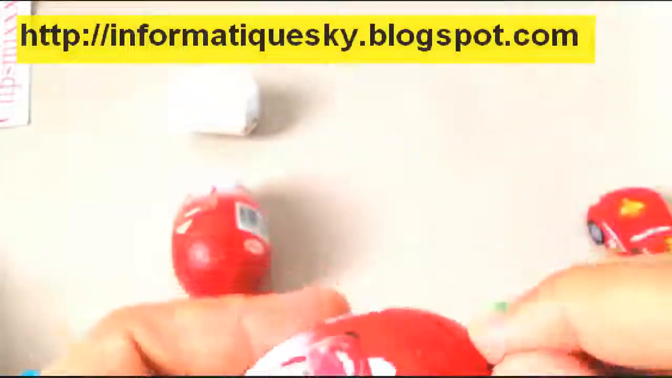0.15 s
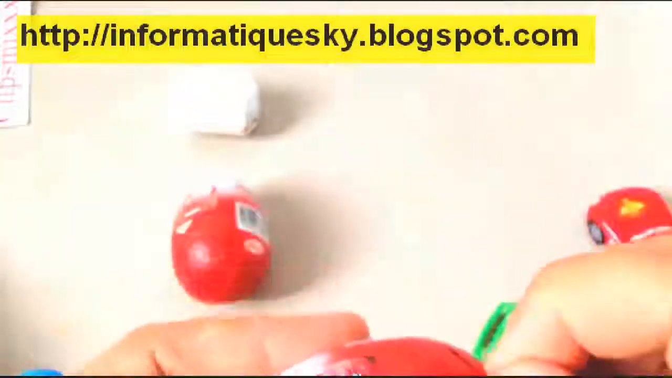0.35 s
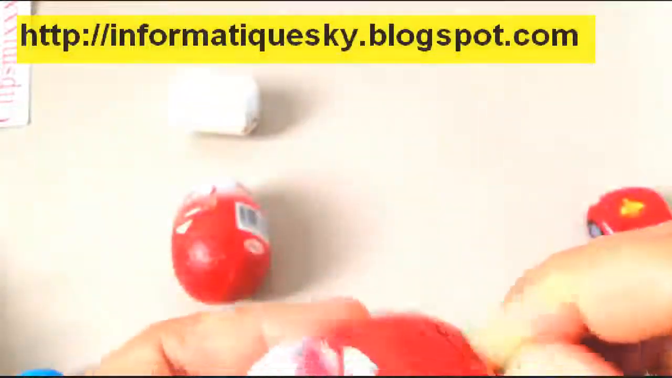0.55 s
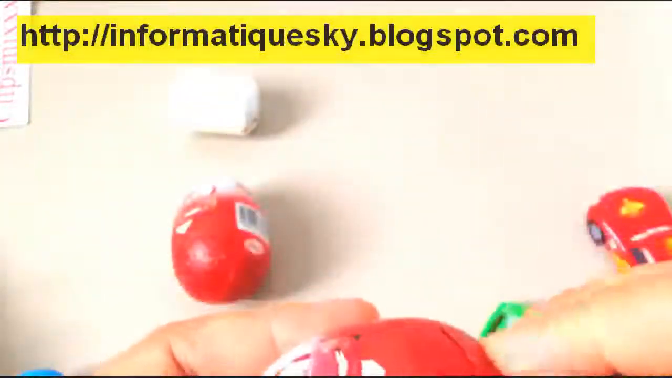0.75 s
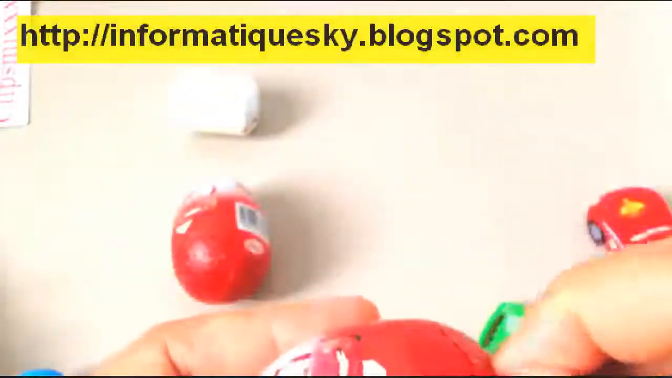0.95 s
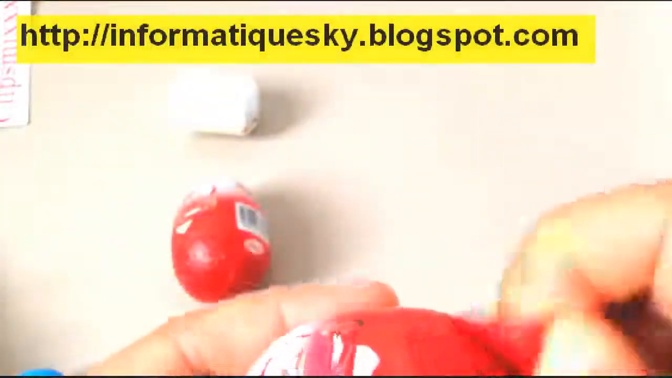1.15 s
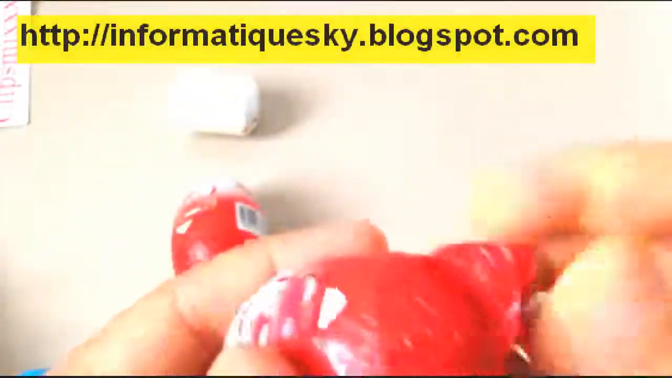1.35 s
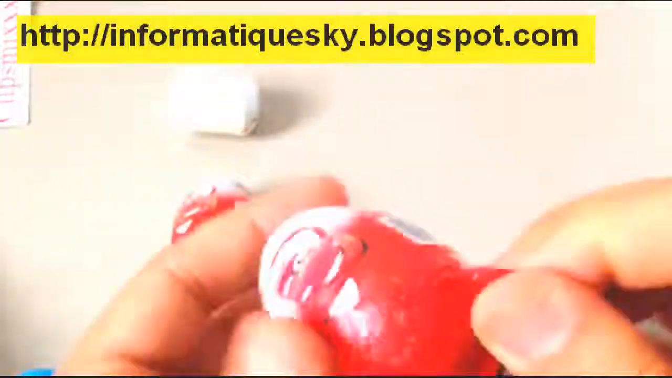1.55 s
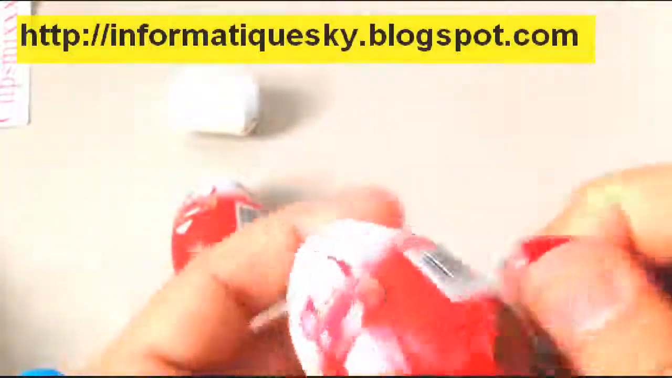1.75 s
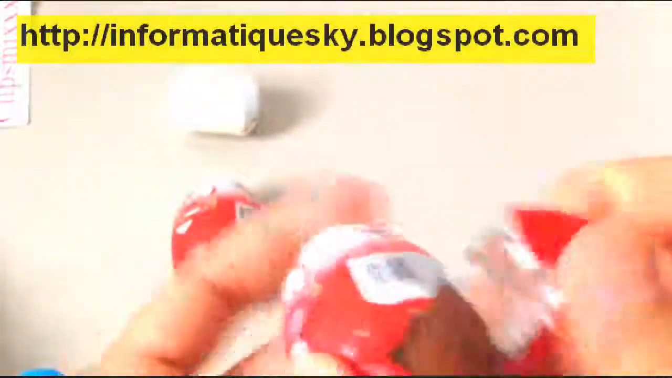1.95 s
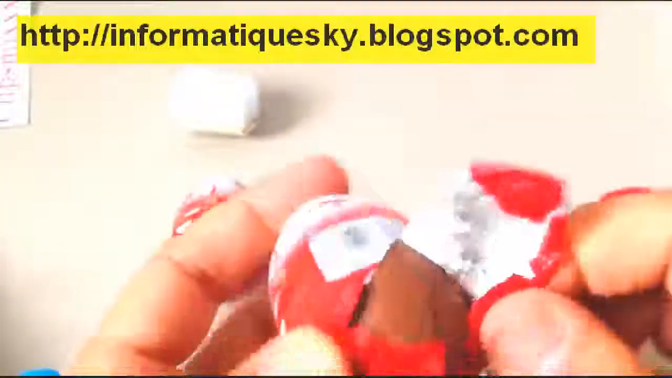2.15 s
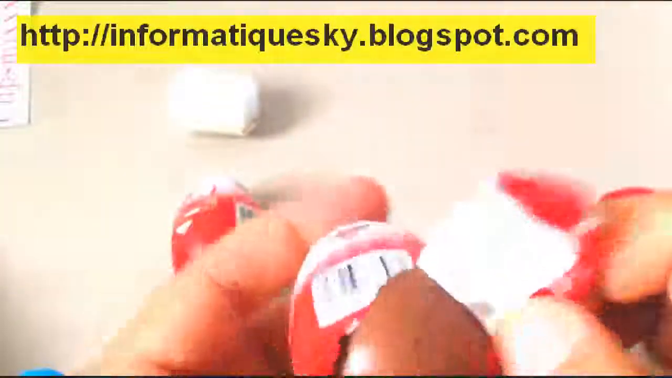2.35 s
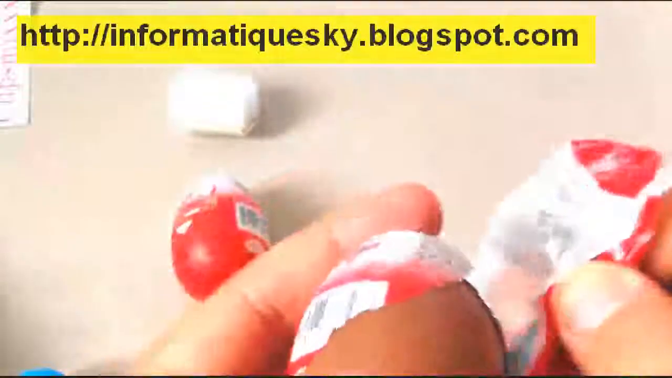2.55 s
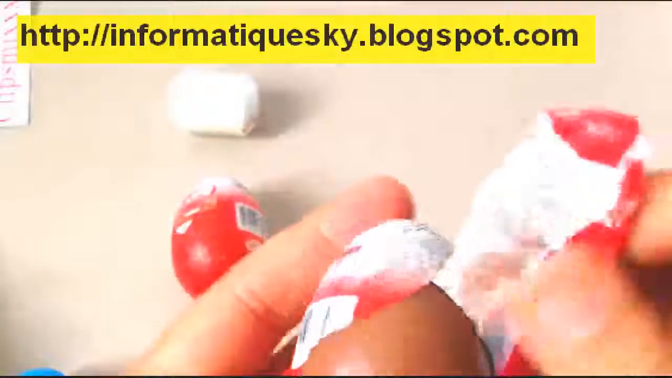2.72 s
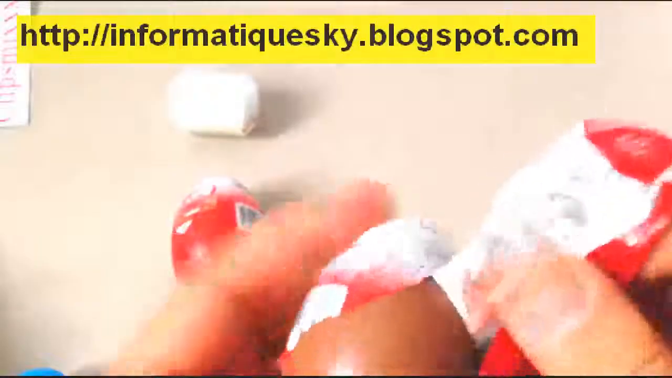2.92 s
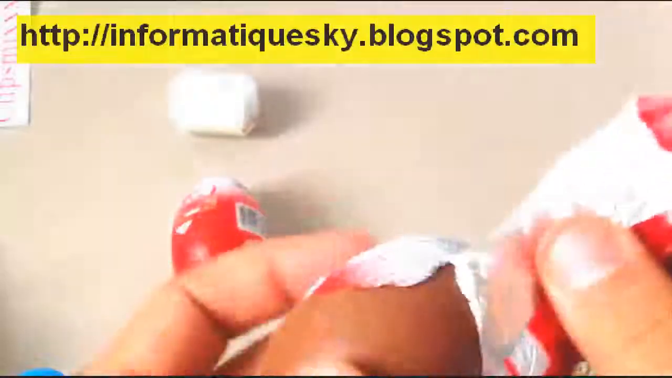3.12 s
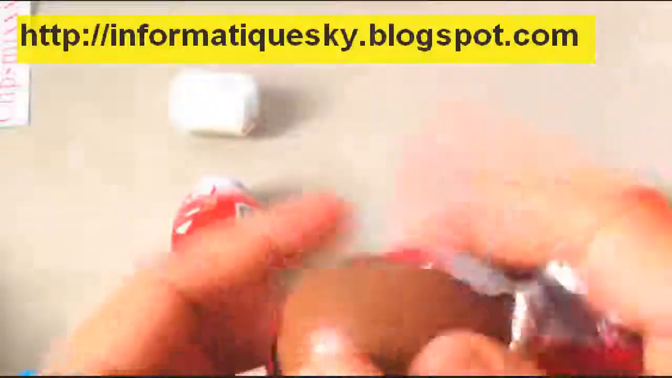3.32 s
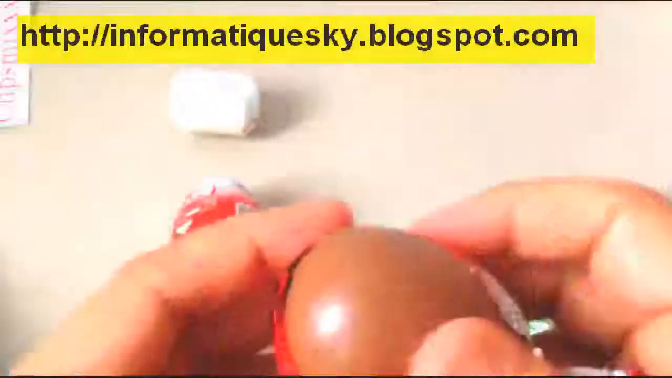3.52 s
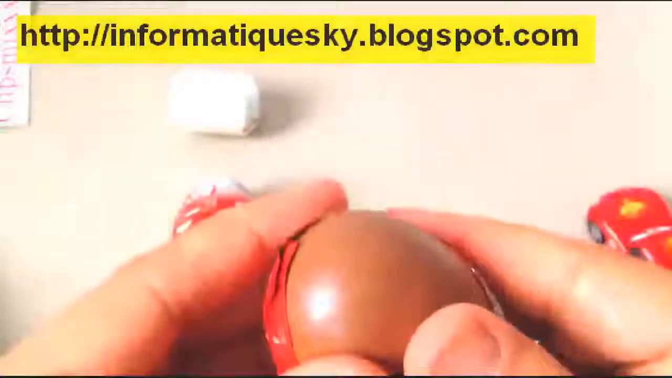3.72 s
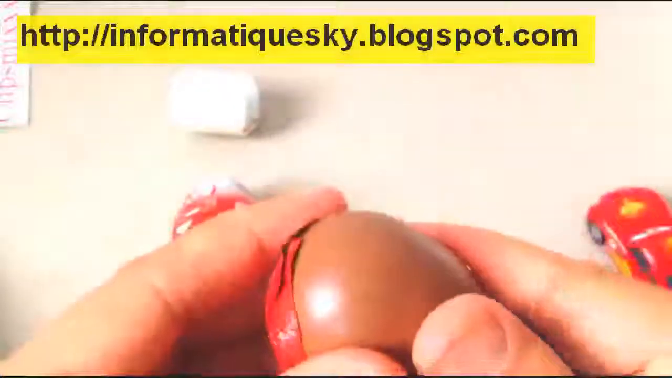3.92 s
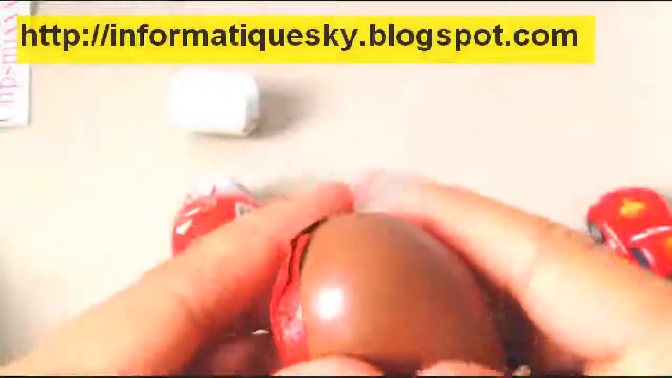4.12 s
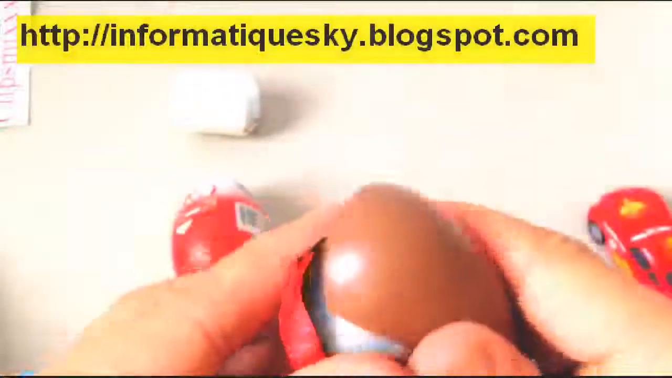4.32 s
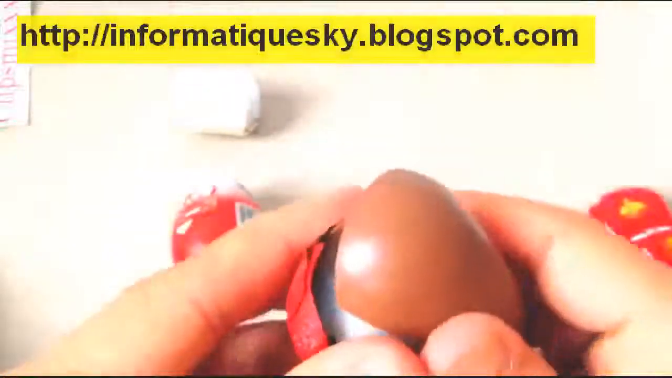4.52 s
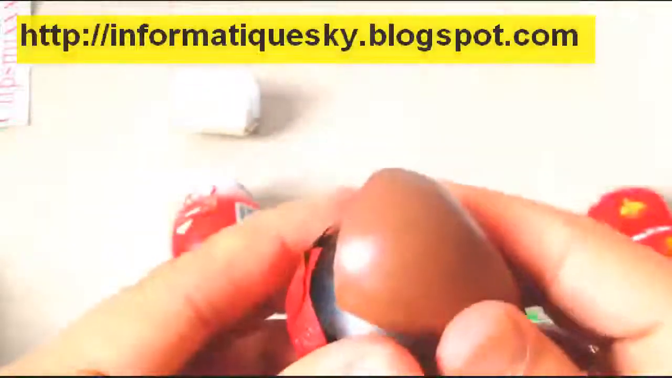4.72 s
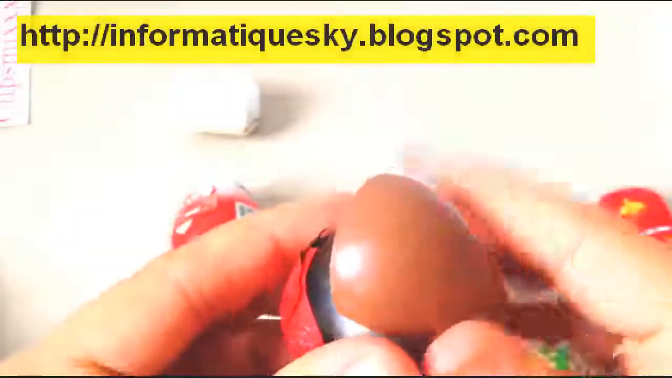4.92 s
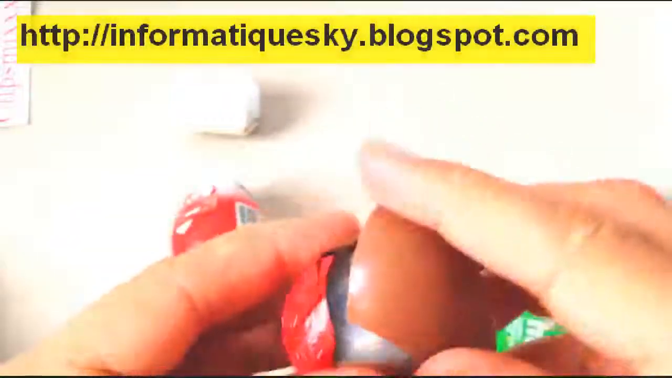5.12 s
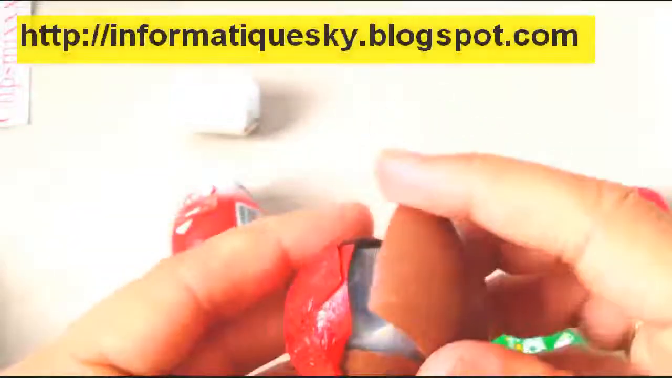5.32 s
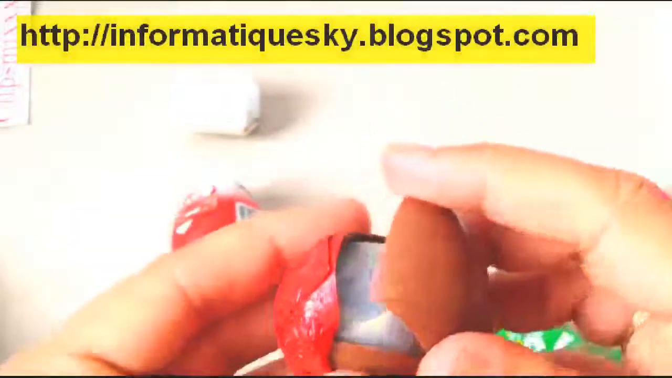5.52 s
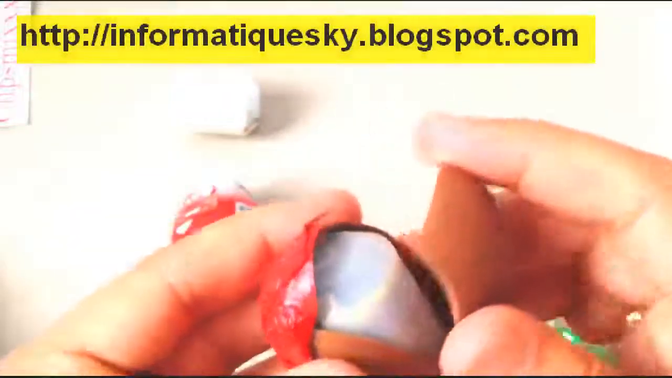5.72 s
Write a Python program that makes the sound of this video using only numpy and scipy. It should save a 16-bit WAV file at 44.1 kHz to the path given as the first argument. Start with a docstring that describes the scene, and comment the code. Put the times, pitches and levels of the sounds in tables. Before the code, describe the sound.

A faint rustle of fingertips on thin foil opens the sound. From about 0.6 seconds, short crinkles and sharp ticks follow as the wrapper is picked off a hollow chocolate egg. The foil tears in bright, uneven bursts, with the sharpest snaps around 1.3 and 1.8 seconds. After a brief lull, dense crunching returns around 2.5 seconds and again from 3 to 3.5 seconds. The handling then turns quieter and sparser: fingers sliding, light rubs on the hollow shell and small crackles, with a clearer tick near 4.2 seconds and another near 5. At about 5.3 seconds the chocolate shell cracks with a short snap, and the sound dies down. Hands bump the table very softly around 3, 3.7 and 5.4 seconds. Everything is close to the microphone in a fairly dry room, over faint rumble, hum and steady hiss.

```python
"""A faint rustle, then crinkling: fingers peel thin metal foil off a hollow chocolate egg.
Each pull buckles many small facets and tears the sheet. Sharp snaps stand out: foil creases
flipping, and near the end the chocolate shell cracking.
Indoors at a table, close to a mono camera microphone. The hands bump the table now and then,
over room rumble, a faint hum and microphone hiss."""
import sys
import numpy as np
from scipy import signal
from scipy.fft import rfft, irfft, next_fast_len
from scipy.io import wavfile
from scipy.ndimage import map_coordinates

SR = 44100
rng = np.random.default_rng(int(sys.argv[2]) if len(sys.argv) > 2 else 0)


def inscribe(sig):
    """Save sig as 16-bit PCM at rate SR to the path in sys.argv[1].

    A 1-D sig is mono; a 2-D sig holds one channel per row.
    Samples are clipped to [-1, 1] before scaling.
    """
    pcm = np.round(np.clip(np.atleast_2d(sig).T, -1, 1) * 32767)
    wavfile.write(sys.argv[1], SR, pcm.astype(np.int16))


N = 258852

# fingers sliding on the foil: time_s, level_db
FINGER_RUSTLE = [(0.0, -67), (1.0, -64.5), (1.8, -56.5), (2.2, -64.5), (2.45, -53.5), (2.75, -59),
                 (3.5, -50.5), (3.92, -62.5), (4.3, -55), (4.42, -58), (4.55, -65), (4.82, -68.5),
                 (5.3, -62.5), (5.87, -75)]
# what a sharp jolt rings in the sheet: pitch_hz, width_hz, gain_db
SHEET_MODES = [(3300, 1540, -2.5), (6500, 1400, 3.5), (10900, 6500, -1.5)]


def crinkle():
    """Each pull buckles and tears the foil in clumps; the hollow egg answers lower down."""
    buckle, ring, tear, shell, fold_hz = pulls()
    clumps = amp(1.97 * wobble(60) + 2.42 * wobble(200))
    crackle = amp(-9) * buckling(buckle, ring, fold_hz) + amp(-6.5) * tear * tearing()
    return clumps * crackle + amp(-0.5) * shell * egg_shell() + amp(-10) * tear * slips()


def pulls():
    """Crunches swell and crumble away: gains of buckling, fold ring, tear and shell, and the fold pitch."""
    # crunches of the pulling hand: peak_s, length_s, level_db, fold_pitch_hz
    crunches = [(0.4, .065, -60.5, 4600), (0.634, 0.038, -46.5, 2270), (0.806, 0.02, -43, 4600),
                (1.04, 0.012, -59.5, 1980), (1.27, 0.076, -45.5, 6660), (1.31, 0.0043, -34.5, 5350),
                (1.403, 0.036, -47, 3680), (1.527, 0.0062, -39, 2720), (1.568, 0.024, -39, 4040),
                (1.632, 0.053, -41.5, 5000), (1.776, 0.033, -33.5, 2840), (1.825, 0.11, -37.5, 2860),
                (1.903, 0.059, -37, 4220), (1.943, 0.057, -39, 6040), (2.024, 0.015, -39, 3470),
                (2.135, 0.033, -38.5, 1555), (2.164, 0.039, -43.5, 2610), (2.395, 0.042, -58, 5130),
                (2.456, 0.072, -39.5, 1520), (2.497, 0.054, -36.5, 5140), (2.523, 0.047, -32.5, 3100),
                (2.555, 0.052, -34, 2400), (2.574, 0.053, -35, 1650), (2.626, 0.037, -41, 1153),
                (2.712, 0.041, -48.5, 4400), (2.793, 0.015, -52.5, 970), (2.868, 0.047, -42, 2500),
                (2.944, 0.016, -44.5, 1400), (3.017, 0.046, -47.5, 1280), (3.068, 0.062, -40.5, 5170),
                (3.1, 0.079, -41, 1590), (3.121, 0.058, -38.5, 2830), (3.168, 0.044, -34, 3600),
                (3.271, 0.019, -37, 2800), (3.292, 0.019, -31.5, 4220), (3.329, 0.023, -36.5, 3400),
                (3.394, 0.24, -53.5, 5800), (3.482, 0.028, -43, 1770), (3.519, 0.06, -42, 4060),
                (3.658, 0.085, -47.5, 2840), (3.786, 0.23, -55.5, 1460), (4.05, 0.055, -62, 2360),
                (4.19, 0.074, -43, 5840), (4.246, 0.0074, -44, 2600), (4.354, 0.15, -53.5, 6060),
                (4.466, 0.13, -61.5, 3490), (4.622, 0.096, -57.5, 6500), (4.673, 0.012, -46, 3600),
                (4.686, 0.013, -44.5, 3540), (4.725, 0.045, -56, 1490), (4.991, 0.034, -49, 4760),
                (5.101, 0.053, -55, 3570), (5.152, 0.042, -55, 2140), (5.269, 0.033, -58, 2350),
                (5.301, 0.017, -48.5, 4400), (5.349, 0.032, -39.5, 2170), (5.385, 0.093, -57.5, 3240),
                (5.452, 0.019, -59.5, 2530), (5.791, 0.03, -60, 2020)]
    # weight of tearing and shell in a crunch as the peeling goes on: time_s, tear_db, shell_db
    peel = [(0.75, -12, -39), (1.03, 6, 4), (1.28, 0, -55), (1.58, 1.5, -11), (1.8, 5.5, -37),
            (1.92, -18, -20.5), (2.1, 0.5, -7), (2.53, -8.5, -21), (2.7, 0.5, -3), (3.06, -8.5, -14.5),
            (3.32, -9, -9), (3.53, -6, -10.5), (4.3, -4, -12), (4.69, -1.5, -11.5), (5.0, 6, -6),
            (5.35, -2, -8.5), (5.8, -32, -15)]
    peak_s, length_s, db, hz = columns(crunches)
    peel_s, *weights = np.transpose(peel)
    tear_db, shell_db = (np.interp(peak_s, peel_s, weight) for weight in weights)
    t = np.arange(0, N / SR, 0.001)
    rise_share, end_drop_db = 0.53, 8.5
    flank = np.maximum((peak_s - t) / rise_share, (t - peak_s) / (1 - rise_share)) / length_s
    level_db = db - end_drop_db * flank ** 2.02
    power = amp(2 * np.maximum(level_db, -140))
    slide = amp(2 * np.interp(t, *np.transpose(FINGER_RUSTLE)))
    ring = power.sum(0)  # sliding fingers ring no fold
    buckle = ring + 0.82 * slide
    tear = (power * amp(2 * tear_db)).sum(0) + slide * amp(-7)
    shell = (power * amp(2 * shell_db)).sum(0) + slide * amp(-29.5)
    loudest_hz = hz[level_db.argmax(axis=0), 0]
    *powers, fold_hz = curves(np.column_stack([t, buckle, ring, tear, shell, loudest_hz]))
    return *np.sqrt(powers), fold_hz


def buckling(buckle, ring, fold_hz):
    """Small facets flip and ring the fold being pulled, with an overtone near its octave."""
    facet_hz = 4000 * (fold_hz / 4000) ** 0.29
    facets = grains(facet_hz, count=17000, octaves=0.487, cycles=2.6, spread_db=3, size=160)
    fold = grains(fold_hz, count=9000, octaves=0.09, cycles=7.6, spread_db=4, size=400)
    overtone = grains(2.03 * fold_hz, count=6000, octaves=0.17, cycles=6.8, spread_db=3, size=256)
    return buckle * facets + ring * (amp(-2) * fold + amp(-7.5) * overtone)


def tearing():
    """The running tear: tiny ticks merge into a bright fizz."""
    # colour of the tear: frequency_hz, gain_db
    colour = [(3000, -22), (6000, 6.5), (8700, 5), (10500, 5), (13500, 7.5), (15500, 5)]
    ticks = grains(9500, count=30000, octaves=0.55, cycles=1, spread_db=3, size=32)
    return coloured(ticks, colour)


def slips():
    """The tear slips in sharp, uneven jerks that ring the sheet."""
    jerks = rng.random(N) < 700 / SR  # about 700 a second
    strength = amp(3.7 * np.minimum(rng.exponential(size=N), 4)) * rng.choice([-1, 1], N)
    return unit(filtered(jerks * strength, resonant(SHEET_MODES)))


def snaps():
    """Foil creases flip and, near the end, the chocolate cracks: a short ring, a crack and a shudder."""
    # sharp snaps of foil, the last two of the chocolate shell: start_s, level_db, pitch_hz
    sharp_snaps = [(0.6222, -35.5, 4730), (0.6346, -30, 4530), (0.634, -37, 2320), (0.808, -24.5, 4170),
                   (1.023, -41, 8900), (1.038, -41.5, 2540), (1.07, -32, 8800), (1.102, -26.5, 9100),
                   (1.191, -39, 8850), (1.225, -30, 13350), (1.2455, -37, 5700), (1.255, -25, 9250),
                   (1.2754, -19.5, 9900), (1.283, -16.5, 10600), (1.307, -20, 5300), (1.46, -35.5, 12200),
                   (1.509, -46, 8200), (1.5236, -31, 9430), (1.5497, -29, 9100), (1.569, -31, 5330),
                   (1.6114, -28.5, 3780), (1.7467, -34.5, 3000), (1.7631, -24, 10720), (1.77, -19, 12500),
                   (1.7702, -26, 10900), (1.7731, -18, 11000), (1.7782, -11.5, 10500), (1.7789, -23, 3570),
                   (1.782, -28, 3800), (1.7863, -27, 4000), (1.7876, -29, 3900), (1.811, -32, 2870),
                   (1.8228, -21.5, 6650), (1.8858, -26, 2670), (1.8992, -23, 4430), (1.912, -25, 4260),
                   (1.938, -33, 5800), (1.974, -41, 13000), (2.0196, -29, 5900), (2.1712, -28, 2670),
                   (2.3166, -44.5, 766), (2.3936, -29, 5100), (2.4338, -22, 10500), (2.441, -29, 7900),
                   (2.4585, -25.5, 7620), (2.477, -28, 7000), (2.5465, -27, 2340), (2.621, -33, 3300),
                   (2.658, -37, 4040), (2.668, -32, 4050), (2.7835, -51, 3830), (2.829, -39, 5950),
                   (2.848, -30, 2830), (2.8777, -31.5, 2350), (2.887, -38, 7500), (2.96, -30, 8600),
                   (3.0063, -29, 1100), (3.028, -37.5, 1620), (3.0749, -25.5, 5440), (3.1023, -24, 2770),
                   (3.1208, -17, 6600), (3.1204, -23, 2780), (3.149, -19, 6160), (3.1577, -35, 3120),
                   (3.173, -25, 6100), (3.1817, -32, 6240), (3.203, -44, 7000), (3.413, -27.5, 12500),
                   (3.455, -34, 1070), (3.468, -31.5, 985), (3.488, -26, 4330), (3.5507, -32, 840),
                   (3.5774, -37.5, 1070), (3.672, -35.5, 2870), (3.6943, -29.5, 3200), (3.885, -45.5, 2170),
                   (3.976, -42.5, 5000), (4.043, -39.5, 2420), (4.06, -42, 3120), (4.198, -27, 5940),
                   (4.229, -47, 5200), (4.2477, -40, 2470), (4.374, -38.5, 1350), (4.3998, -42.5, 1390),
                   (4.409, -41.5, 1410), (4.671, -49, 3660), (4.9728, -34, 4600), (5.138, -47, 1880),
                   (5.225, -48, 2520), (5.3412, -22.5, 3470), (5.3447, -31, 4830)]
    start_s, db, hz = columns(sharp_snaps)
    t = np.arange(1024) / SR
    ring = damped_sine(hz * t, decay_cycles=2.57, rise_cycles=0.47)
    attack, shudder = amp(-60 * t / 0.0058), amp(-11 - 60 * t / 0.027)
    burst = rng.standard_normal(ring.shape) * (attack + shudder)
    # the crack holds little below the snap's pitch and softens on top, sooner for low snaps
    f = np.fft.rfftfreq(len(t), 1 / SR)
    band = (1j * f / (0.52 * hz + 1j * f)) ** 2 / (1 + 1j * f / np.minimum(hz, 7500))
    crack = irfft(rfft(burst) * band, len(t))
    crack /= np.linalg.norm(crack, axis=1, keepdims=True)
    crack_db = 8 - np.log2(hz / 4000)  # 1 dB weaker per octave up
    # each snap jolts the whole sheet, high ones hardest
    jolts = place(start_s, amp(db - 18) * np.minimum(hz / 6000, 1))
    sheet = filtered(jolts, resonant(SHEET_MODES))
    return sheet + place(start_s, amp(db) * (1.19 * ring + amp(crack_db) * crack))


def egg_shell():
    """Small rubs ring the hollow chocolate."""
    # shell resonances: pitch_hz, width_hz, gain_db
    modes = [(320, 175, 0.5), (600, 140, 4), (908, 300, 0.5), (1632, 420, 1), (2800, 430, 3)]
    rubs = grains(1100, count=9000, octaves=0.55, cycles=1, spread_db=3, size=160)
    return unit(filtered(filtered(rubs, resonant(modes)), resonant(modes)))


def sliding_fingers():
    """Fingertips slide over the foil: a smooth hiss with lone ticks."""
    level_db, = curves(FINGER_RUSTLE)
    hiss = grains(5800, count=40000, octaves=0.39, cycles=3, spread_db=0.5, size=64)
    ticks = grains(6500, count=500, octaves=0.606, cycles=5.4, spread_db=1.5, size=96)
    return amp(level_db - 13.5) * hiss + amp(level_db - 12.5) * ticks


def cavity(f):
    """Thin foil radiates little bass; the hollow around it lifts a few bands."""
    # resonances of egg, cupped hands and table: pitch_hz, width_hz, lift_db
    modes = [(1440, 1170, 2.5), (2220, 210, 3.5), (2540, 71, 2), (4530, 2600, 2), (9800, 2700, 0.5)]
    lift = 1 + sum((amp(db) - 1) * resonance(f, hz, width) for hz, width, db in modes)
    return lift * (1j * f / (300 + 1j * f)) ** 2 * amp(-2)


def table_bumps():
    """Hands meet the table softly: a couple of low cycles."""
    # hand contacts: start_s, level_db, pitch_hz
    contacts = [(2.986, -56, 80), (3.704, -50.5, 138), (5.353, -46, 290)]
    start_s, db, hz = columns(contacts)
    thud = damped_sine(hz * np.arange(4096) / SR, decay_cycles=1.5, rise_cycles=0.5)
    return place(start_s, amp(db) * thud)


def room(x, reverb_s=0.079):
    """A short diffuse tail from table and walls, just behind the direct sound."""
    t = np.arange(SR // 4) / SR
    tail = rng.standard_normal(len(t)) * amp(-60 * t / reverb_s)
    return signal.fftconvolve(x, np.pad(tail / np.linalg.norm(tail), (120, 0)))[:N]


def room_tone(hum_hz=60.3):
    """Unsteady room rumble and a wavering hum."""
    # slow drift of both: time_s, rumble_db, hum_db
    levels = [(0.0, -71.5, -67), (1.13, -69.5, -71.5), (1.6, -71.5, -76), (3.87, -67.5, -117),
              (5.87, -72, -74)]
    # colour of the rumble: frequency_hz, gain_db
    colour = [(15, -24), (25, -0.5), (54, -4.5), (97, -3.5), (700, -19), (910, -59), (1540, -120)]
    rumble_db, hum_db = curves(levels)
    rumble = amp(rumble_db + 0.41 * wobble(3.4)) * coloured(rng.standard_normal(N), colour)
    hum_gain = amp(hum_db + 3.9 * wobble(26))
    return rumble + hum_gain * np.sin(2 * np.pi * hum_hz * np.arange(N) / SR + 0.2 * wobble(7.6))


def microphone_hiss(level_db=-67.5):
    """The microphone's own noise, almost steady."""
    # colour of the hiss: frequency_hz, gain_db
    colour = [(290, -4), (500, -10), (619, -22), (684, -3), (976, -9.5), (1110, -8.5), (2530, -7),
              (2760, -9), (15000, -8.5)]
    return amp(level_db + 0.26 * wobble(2.23)) * coloured(rng.standard_normal(N), colour)


def grains(pitch_hz, count, octaves, cycles, spread_db, size):
    """Damped sines, size samples long, at random times; a few are much stronger than the rest."""
    start = rng.integers(0, N, count)
    centre_hz = np.broadcast_to(pitch_hz, N)[start]
    hz = np.clip(centre_hz * 2 ** (octaves * rng.standard_normal(count)), 200, 15000)[:, None]
    gain = amp(spread_db * np.minimum(rng.exponential(size=count), 4))[:, None] * np.sqrt(hz)
    rings = damped_sine(hz * np.arange(size) / SR, cycles, rise_cycles=0.31)
    return unit(place(start / SR, gain * rings))


def damped_sine(turns, decay_cycles, rise_cycles):
    """A dying ring with a soft start."""
    return np.sin(2 * np.pi * turns) * np.exp(-turns / decay_cycles) * (1 - np.exp(-turns / rise_cycles))


def place(start_s, shapes):
    """Sums one short shape per start time."""
    at = np.round(start_s * SR).astype(int).reshape(-1, 1) + np.arange(shapes.shape[1])
    return np.bincount(at.ravel(), shapes.ravel(), N + shapes.shape[1])[:N]


def resonance(f, hz, width):
    """Band-pass response of one mode."""
    return 1j * f * width / (hz * hz - f * f + 1j * f * width)


def resonant(modes):
    """Response of several modes, alternating in sign."""
    return lambda f: sum((-1) ** k * amp(db) * resonance(f, hz, width)
                         for k, (hz, width, db) in enumerate(modes))


def filtered(x, response):
    """x through a complex frequency response."""
    size = next_fast_len(N + SR // 2)
    return irfft(rfft(x, size) * response(np.fft.rfftfreq(size, 1 / SR)), size)[..., :N]


def coloured(x, colour):
    """x shaped by gains along a log frequency axis, at rms 1."""
    hz, db = np.transpose(colour)
    return unit(filtered(x, lambda f: amp(np.interp(np.log(f + 1), np.log(hz + 1), db))))


def wobble(rate):
    """A smooth random curve, rate knots a second."""
    return map_coordinates(rng.standard_normal(int(N * rate / SR) + 4), [np.arange(N) * rate / SR])


def curves(rows):
    """One value per sample for each column after the time."""
    time_s, *values = np.transpose(rows)
    return [np.interp(np.arange(N) / SR, time_s, value) for value in values]


def columns(rows):
    return np.transpose(rows)[:, :, None]


def amp(db):
    return 10 ** (np.asarray(db) / 20)


def unit(x):
    return x / np.sqrt(np.mean(x ** 2) + 1e-20)


def scene():
    """Foil and egg up close with a little room; one microphone feeds both channels."""
    egg = filtered(crinkle() + sliding_fingers() + snaps(), cavity)
    mono = egg + amp(-12) * room(egg) + table_bumps() + room_tone() + microphone_hiss()
    return np.array([mono, mono])


def record(dry, low_cut_hz=36, rolloff_hz=15000, limit_hz=16450):
    """The camera cuts the deepest rumble and keeps nothing above its band limit."""
    def passband(hz):
        treble = amp(-np.clip(hz - rolloff_hz, 0, 1400) / 14) * (hz < limit_hz)
        return treble / (1 + (low_cut_hz / (hz + 1)) ** 5)
    return filtered(dry, passband)


dry = scene()
out = record(dry)
inscribe(out)
```